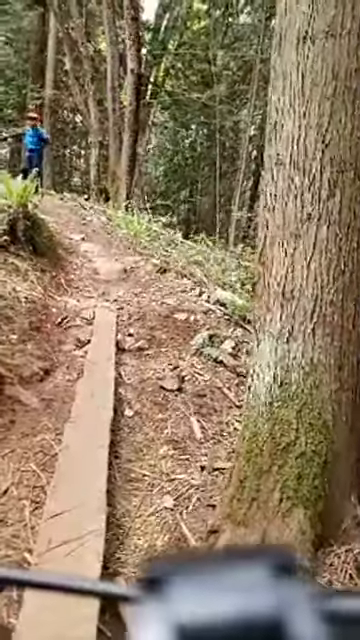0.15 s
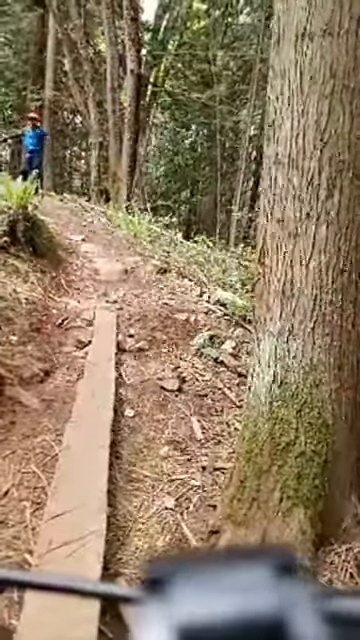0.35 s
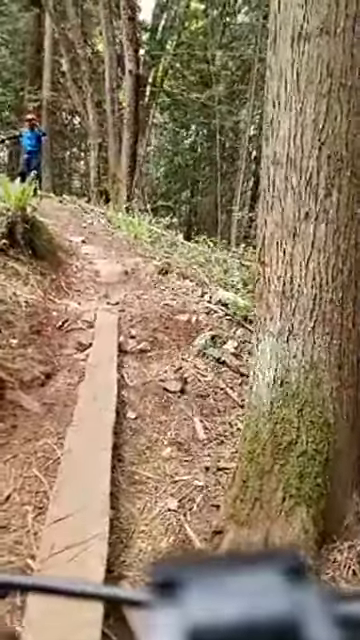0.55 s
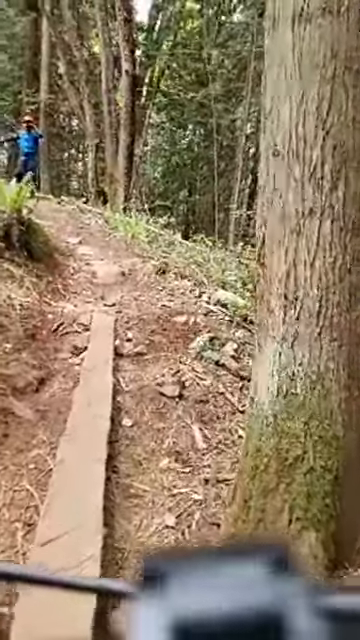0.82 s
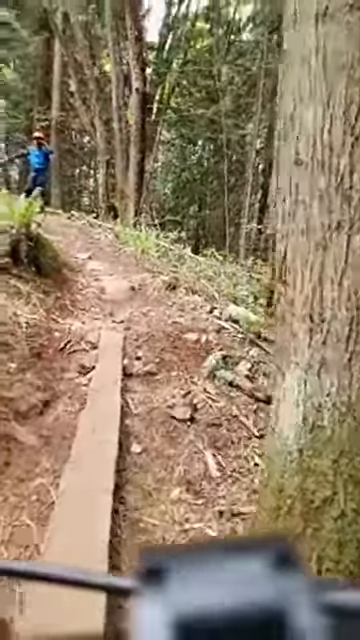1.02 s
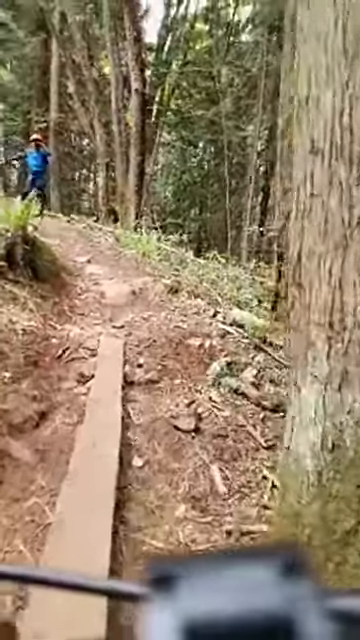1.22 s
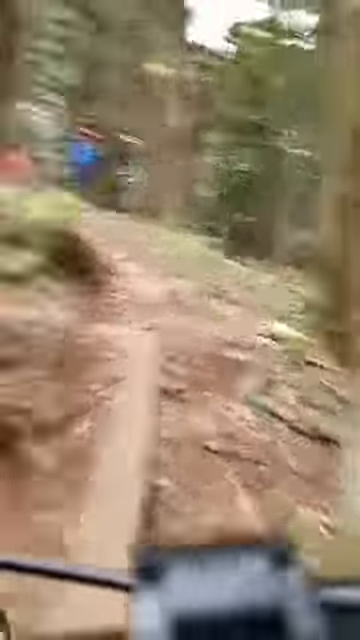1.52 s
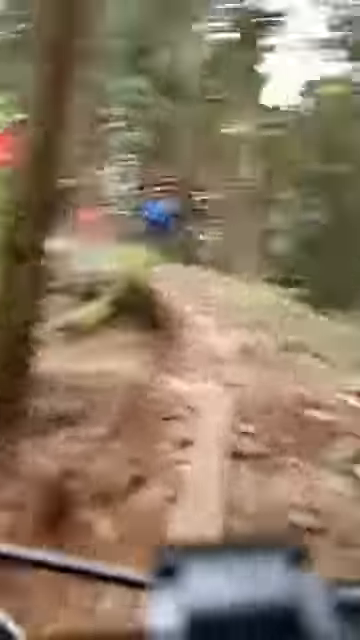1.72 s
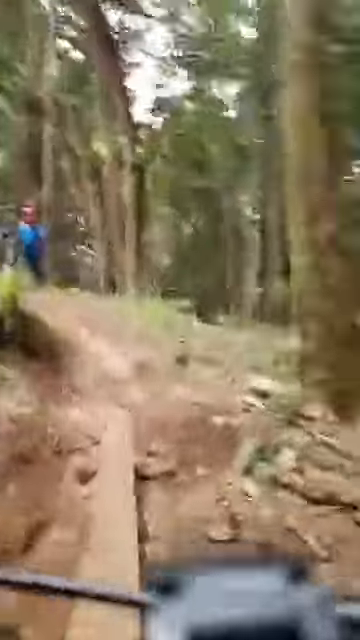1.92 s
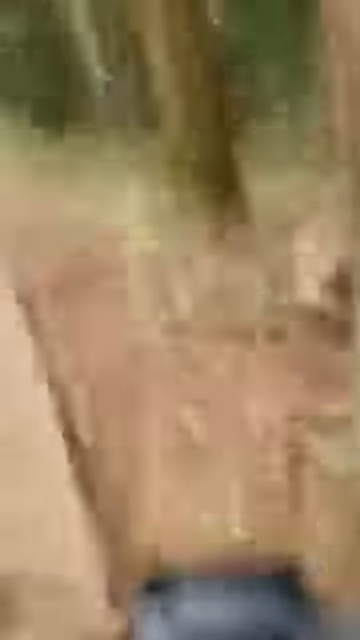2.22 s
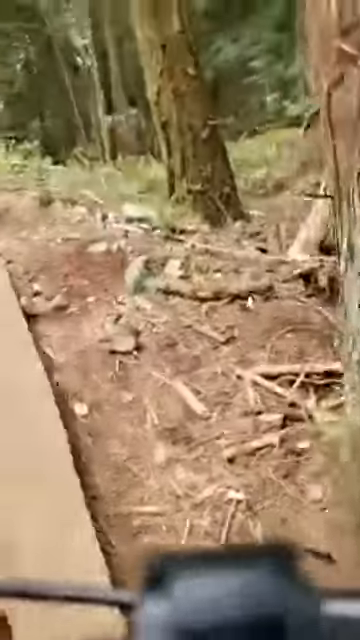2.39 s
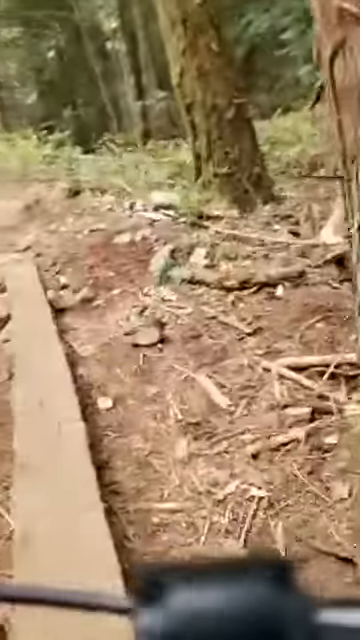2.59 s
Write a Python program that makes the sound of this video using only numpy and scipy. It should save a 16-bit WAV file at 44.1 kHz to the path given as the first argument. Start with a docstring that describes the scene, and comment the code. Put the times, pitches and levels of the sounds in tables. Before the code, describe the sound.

A mountain bike starts along a rough dirt trail, heard close from a rider's shaking camera. Almost silent at first, with faint freewheel ticking around 0.3-0.7 s. From 1 s, small clicks, rubbing and low wobbling rumble grow; light knocks and thuds come at 1.3-1.7 s, chain slaps and tyre roar near 1.7-1.9 s. Violent frame bangs hit at 2.0-2.1 and 2.2 s, then clicks and rumble die away.

```python
"""A mountain bike's frame takes hard knocks as the bike starts rolling on a rough forest trail, heard from a
camera on the rider. Knocks are noise cracks with ringing tones, and the wheels thud with a falling pitch.
Low noise rumbles in the frame, and the camera mount swings as a wavering deep tone. The tyres roar and hiss
as grainy noise. Chain slaps and small clicks are short noise bursts, rubs are gliding noise bands and the
freewheel is a faint resonant ticking. A quiet noise bed lies beneath."""
import sys
import numpy as np
from scipy.fft import rfft, irfft, next_fast_len
from scipy.io import wavfile
from scipy.ndimage import map_coordinates

SR = 44100
rng = np.random.default_rng(int(sys.argv[2]) if len(sys.argv) > 2 else 0)


def generate_wav(sig):
    """Save sig (samples, or channels by samples) to the path in sys.argv[1] as 16-bit PCM at SR."""
    pcm = np.round(np.clip(np.atleast_2d(sig).T, -1, 1) * 32767).astype(np.int16)
    wavfile.write(sys.argv[1], SR, pcm)


N = 121275

# Spectrum of grit hiss, also the airy part of the clicks: (f/Hz, relative level per Hz/dB)
GRIT_COLOUR = [(1290, -3.5), (2890, -4.5), (3740, -6), (4310, -2.5), (5350, -3), (7210, -18.5), (7970, -26),
               (8950, -12.5), (11600, -7), (16000, -17.5)]


def amp(db):
    """Turns dB into linear gain."""
    return 10 ** (np.asarray(db) / 20)


def unit(x):
    """Scales a signal to rms 1."""
    return x / np.sqrt(np.mean(x ** 2) + 1e-20)


def curves(rows):
    """Draws straight lines through each column after the time, one value per sample."""
    times_s, *columns = np.transpose(rows)
    t = np.arange(N) / SR
    return [np.interp(t, times_s, column) for column in columns]


def wobble(rate):
    """Draws a smooth random curve with the given number of knots per second."""
    knots = rng.standard_normal(int(N * rate / SR) + 4)
    return map_coordinates(knots, [np.arange(N) * rate / SR])


def filtered(x, response):
    """Multiplies the spectrum of x by a response of frequency."""
    m = next_fast_len(len(x) + 8192)
    spectrum = rfft(x, m) * response(np.fft.rfftfreq(m, 1 / SR))
    return irfft(spectrum, m)[:len(x)]


def coloured(x, tone, tilt_db=0):
    """Shapes x by a (Hz, dB) curve plus a tilt in dB per octave, then scales it to rms 1."""
    f, db = np.transpose(tone)

    def response(hz):
        curve_db = np.interp(np.log(hz + 1), np.log(f + 1), db)
        return amp(curve_db + tilt_db * np.log2((hz + 100) / 1000))

    return unit(filtered(x, response))


def peak(centre_hz, width_hz):
    """Gives the response of one damped resonance."""
    return lambda hz: 1j * hz * width_hz / (centre_hz ** 2 - hz ** 2 + 1j * hz * width_hz + 1e-9)


def ring(hz, width, n):
    """Passes noise twice through one resonance; width is relative to its centre."""
    resonance = peak(hz, width * hz)
    return unit(filtered(rng.standard_normal(n), lambda f: resonance(f) ** 2))


def gritty(share):
    """Mixes noise with scattered grains of very unequal size; share is the grains' part of the power."""
    grains_per_s, spread_db = 1200, 2.2
    hit = rng.random(N) < grains_per_s / SR
    size = amp(spread_db * rng.exponential(1, N)) * rng.standard_normal(N)
    return np.sqrt(share) * unit(hit * size) + np.sqrt(1 - share) * rng.standard_normal(N)


def add(track, s, db, sound, rise_s, t60):
    """Puts a burst on the track at s seconds: quick rise, exponential fall."""
    t = np.arange(len(sound)) / SR
    part = track[round(s * SR):][:len(t)]
    fall = amp(db - 60 * t / max(t60, .003))
    rise = 1 - np.exp(-t / rise_s)
    part += (fall * rise * sound)[:len(part)]


def knocks():
    """Blows on the frame: a noise crack excites the metal, and one tone rings slightly longer."""
    # Each knock: (t/s, level before crack trim and ring offset/dB, crack t60/s, tilt/dB per octave,
    # ring f/Hz, ring offset/dB)
    blows = [(0.93, -40, 0.05, -4, 648, -10.5), (1.277, -37.5, 0.024, 0.5, 1980, -7.5),
             (1.467, -32, 0.09, -2, 460, -12.5), (1.539, -32, 0.054, 1, 986, -3.5),
             (1.659, -34.5, 0.036, -7.5, 833, -2), (2.014, -9, 0.024, 2, 1540, -8),
             (2.018, -26, 0.33, -6, 531, -2.5), (2.066, -7.5, 0.024, -1, 2030, -13.5),
             (2.089, -22, 0.084, -0.5, 518, -9.5), (2.212, -25.5, 0.033, 6, 1440, -1),
             (2.235, -11.5, 0.035, -1, 785, -10), (2.263, -24.5, 0.02, 0, 624, -4),
             (2.479, -42.5, 0.047, 11.5, 370, 4.5)]
    # Spectrum of the crack before its tilt: (f/Hz, relative level per Hz/dB)
    crack_tone = [(120, -50), (200, 7), (305, 3.5), (1120, -9), (2020, -15.5), (3020, -20.5), (5040, -24.5),
                  (7140, -42), (10900, -43), (16000, -46)]
    rise_s, crack_trim_db = 0.00019, -3.5
    ring_lasts = 1.135  # ring t60 over crack t60
    out, t = np.zeros(N), np.arange(SR // 5) / SR
    for s, db, t60, tilt_db, hz, ring_db in blows:
        crack = coloured(rng.standard_normal(len(t)), crack_tone, tilt_db)
        add(out, s, db + crack_trim_db, crack, rise_s, t60)
        tone = np.sin(2 * np.pi * (hz * t + rng.random()))
        add(out, s, db + ring_db, tone, rise_s, ring_lasts * t60)
    return out


def thuds():
    """Wheel thuds: a decaying sine that starts high and sags at once to its final pitch."""
    # Each thud: (t/s, level before the rise and fall/dB, final f/Hz)
    blows = [(1.275, -29.5, 74), (1.472, -19.5, 80), (1.539, -22, 76), (1.659, -22.5, 80.5),
             (1.739, -20.5, 83), (1.773, -20, 74), (2.013, -8, 71.5), (2.067, -7.5, 99.5),
             (2.089, -10, 107.6), (2.218, -14, 62.4), (2.231, -6.5, 95.2)]
    start_ratio, sag_s = 3.55, 0.005485  # first over final pitch; time constant of the sag
    rise_s, t60_s = 0.014, 0.1
    out, t = np.zeros(N), np.arange(SR // 5) / SR
    # Phase in cycles for a final pitch of 1 Hz
    turns = np.cumsum(1 + (start_ratio - 1) * np.exp(-t / sag_s)) / SR
    for s, db, hz in blows:
        add(out, s, db, np.sin(2 * np.pi * hz * turns), rise_s, t60_s)
    return out


def rumble():
    """Bumps carried by the frame: low noise that swells and drops."""
    # Rumble level: (t/s, level/dB)
    swells = [(0.0, -74.5), (0.78, -62), (1.44, -52.5), (1.48, -39), (1.7, -45), (1.79, -32), (1.9, -43.5),
              (2.005, -52), (2.05, -27), (2.14, -34), (2.2, -36.5), (2.24, -21), (2.29, -40), (2.75, -59)]
    # Rumble spectrum: (f/Hz, relative level per Hz/dB)
    frame_tone = [(32, -17), (55, 0), (91, 5), (156, -2.5), (285, -15), (650, -34), (1100, -120)]
    level_db, = curves(swells)
    return amp(level_db) * coloured(rng.standard_normal(N), frame_tone)


def shake():
    """The camera mount swings at its own low, wandering pitch, blurred by deep noise."""
    # Level of the deep shake: (t/s, level/dB)
    swells = [(0, -66.5), (.57, -59), (.83, -59.5), (.97, -46), (1.02, -57), (1.06, -40.5), (1.11, -53.5),
              (1.19, -40), (1.26, -58), (1.35, -39), (1.465, -56), (1.49, -29.5), (1.64, -41.5),
              (1.68, -33), (1.73, -33), (1.81, -24), (2.0, -46.5), (2.035, -31), (2.14, -24.5), (2.18, -27),
              (2.26, -18.5), (2.3, -29.5), (2.34, -33), (2.41, -40.5), (2.5, -37), (2.66, -45), (2.75, -62)]
    # Pitch of the swing before its wander: (t/s, f/Hz)
    pitch = [(0, 54.88), (1.1, 55.4), (1.4, 45.18), (2.0, 42.95), (2.07, 49), (2.2, 40.01), (2.75, 42.3)]
    # Spectrum of the deep noise: (f/Hz, relative level per Hz/dB)
    deep_tone = [(15, -22), (38, 3.5), (90, -8), (120, -24), (200, -120)]
    wander, noise_share = 0.1192, 0.29  # relative pitch wander; noise part of the power
    (level_db,), (hz,) = curves(swells), curves(pitch)
    turns = np.cumsum(hz * (1 + wander * wobble(15))) / SR + rng.random()
    swing = np.sqrt(2) * np.sin(2 * np.pi * turns)
    noise = coloured(rng.standard_normal(N), deep_tone)
    return amp(level_db) * (np.sqrt(1 - noise_share) * swing + np.sqrt(noise_share) * noise)


def tyres():
    """Tyre knobs roar and grit hisses; grainy noises share one flutter and each adds its own."""
    # Rolling levels before the flutter: (t/s, roar level/dB, grit level/dB)
    rolling = [(0, -83, -83), (.48, -69, -72), (.5, -61.5, -70), (.6, -62.5, -70.5), (.7, -85.5, -77.5),
               (.88, -78, -69.5), (.95, -65.5, -68), (1.05, -61.5, -71), (1.2, -57.5, -67),
               (1.3, -51, -57.5), (1.45, -52.5, -55), (1.5, -51.5, -52.5), (1.56, -47, -55),
               (1.64, -56, -51.5), (1.7, -59.5, -59.5), (1.78, -38.5, -47), (1.88, -48.5, -56.5),
               (1.92, -53, -60.5), (2.0, -55, -64), (2.04, -35, -50.5), (2.11, -41.5, -51),
               (2.15, -44, -59.5), (2.2, -37, -46.5), (2.25, -45, -42.5), (2.28, -49, -62),
               (2.42, -50.5, -58), (2.52, -57.5, -60), (2.62, -59.5, -62.5), (2.75, -67.5, -66)]
    # Spectrum of the roar: (f/Hz, relative level per Hz/dB)
    roar_tone = [(120, -4.5), (368, -4.5), (602, -7), (720, -8), (1150, -11.5), (3500, -26.5),
                 (4550, -32.5), (7700, -120)]
    roar_db, grit_db = curves(rolling)
    flutter = wobble(25.07)
    roar_gain = amp(roar_db + 0.5 * flutter + 2.4 * wobble(40))
    grit_gain = amp(grit_db + 1.5 * flutter + 1.9 * wobble(60))
    roar = roar_gain * coloured(gritty(0.33), roar_tone)
    grit = grit_gain * coloured(gritty(0.13), GRIT_COLOUR)
    return roar + grit


def slaps():
    """Chain slaps: ragged noise bursts with a fast rise and a short fall."""
    # Each slap: (t/s, level before trim/dB, t60/s)
    strikes = [(1.6917, -24.5, 0.044), (1.7265, -25, 0.051), (1.7656, -22, 0.038), (1.7788, -21, 0.016),
               (1.8079, -22.5, 0.042), (1.839, -31, 0.062), (1.858, -24.5, 0.052)]
    # Spectrum of the chain: (f/Hz, relative level per Hz/dB)
    chain_tone = [(880, -29), (1800, -7), (2540, -3.5), (3150, -10), (3480, -15.5), (4870, 0.5),
                  (7540, -22.5), (8740, -14.5), (10700, -6.5), (16000, -7.5)]
    rise_s, trim_db = 0.00067, -6.5
    out = np.zeros(N)
    for s, db, t60 in strikes:
        noise = coloured(rng.standard_normal(SR // 6), chain_tone)
        add(out, s, db + trim_db, noise, rise_s, t60)
    return out


def clicks():
    """Small clicks of stones and cables: resonant noise under a broad hiss."""
    # Each click: (t/s, level before trim/dB, centre f/Hz, hiss over resonant noise/dB)
    taps = [(0.928, -42.5, 4570, -6), (.985, -40.5, 1850, -20), (1.215, -47, 4940, 1),
            (1.366, -40, 4440, 0), (1.478, -44.5, 4500, 9.5), (1.507, -39, 5400, 1),
            (1.977, -42.5, 3740, 2), (2.158, -36, 5330, -3), (2.245, -40, 3000, 2), (2.276, -39, 3050, 2),
            (2.297, -36.5, 4480, -8), (2.317, -29.5, 2190, -12), (2.336, -32, 2870, -5),
            (2.375, -42, 2870, 0), (2.562, -46.5, 3367, 6),]
    rise_s, t60_s, trim_db = .0005, 0.025, -6
    width = 0.23  # of each resonance, relative to its centre
    out, n = np.zeros(N), SR // 6
    for s, db, hz, air_db in taps:
        air = amp(air_db) * coloured(rng.standard_normal(n), GRIT_COLOUR)
        add(out, s, db + trim_db, ring(hz, width, n) + air, rise_s, t60_s)
    return out


def rubs():
    """Tyre and brake rubbing: narrow noise bands whose centres glide while something drags."""
    # One path per rub: (t/s, centre f/Hz, level/dB)
    paths = [
        [(.98, 1250, -86), (1.05, 1280, -72), (1.2, 1400, -67.5), (1.3, 1520, -54.5), (1.36, 1500, -69),
         (1.45, 1700, -53), (1.52, 1750, -70)],
        [(1.0, 480, -71), (1.13, 470, -58.5), (1.3, 720, -64), (1.55, 900, -58.5)],
        [(2.09, 950, -53), (2.13, 1050, -46), (2.19, 1350, -54), (2.22, 1600, -53)],
        [(2.33, 730, -61), (2.4, 720, -47.5), (2.47, 710, -63.5)],
    ]
    # Knot rate of each rub's random modulation, which sets its bandwidth: (rate/Hz)
    widths_hz = [302.5, 246.7, 151.1, 42]
    out, t = np.zeros(N), np.arange(N) / SR
    for rows, width_hz in zip(paths, widths_hz):
        hz, level_db = curves(rows)
        outside_s = np.maximum(rows[0][0] - t, 0) + np.maximum(t - rows[-1][0], 0)
        fade_db = -400 * outside_s  # fades in before the path and out after it
        phase = 2 * np.pi * np.cumsum(hz) / SR
        band = wobble(width_hz) * np.sin(phase) + wobble(width_hz) * np.cos(phase)
        out += amp(level_db + fade_db) * unit(band)
    return out


def freewheel():
    """Pawl ticks of uneven strength and hiss ring through one narrow resonance, applied twice."""
    # Level of ticks and hiss together: (t/s, level/dB)
    ticking = [(0, -80.5), (.22, -82), (.3, -72.5), (.55, -68.5), (.7, -78.5)]
    ticks_per_s, jitter = 50, 0.13  # mean rate; its relative wander
    hiss_share = 0.62  # of the power before the resonance
    pawl = peak(5260, 610)  # centre and width in Hz
    level_db, = curves(ticking)
    turns = np.cumsum(ticks_per_s * (1 + jitter * wobble(13))) / SR
    strikes = np.diff(np.floor(turns), prepend=0) > 0
    ticks = unit(strikes * amp(2.6 * rng.standard_normal(N)))
    blend = np.sqrt(1 - hiss_share) * ticks + np.sqrt(hiss_share) * rng.standard_normal(N)
    return amp(level_db) * unit(filtered(blend, lambda hz: pawl(hz) ** 2))


def still():
    """The quiet of forest and microphone: a steady coloured noise."""
    # Spectrum of the quiet: (f/Hz, relative level per Hz/dB)
    quiet_tone = [(300, -4), (600, -19), (1900, -21), (4100, -25), (5400, -11), (7400, -27), (9000, -19),
                  (9800, -25), (12300, -13), (16000, -20)]
    return amp(-79.5) * coloured(rng.standard_normal(N), quiet_tone)


def scene():
    """Sums all sources into one channel."""
    bike = knocks() + thuds() + rumble() + shake() + tyres()
    details = slaps() + clicks() + rubs() + freewheel()
    return (bike + details + still())[None]


def record(dry):
    """The camera keeps nothing above its band limit."""
    top_hz = 15950
    return filtered(dry[0], lambda hz: hz < top_hz)[None]


dry = scene()
out = record(dry)
generate_wav(out)
```